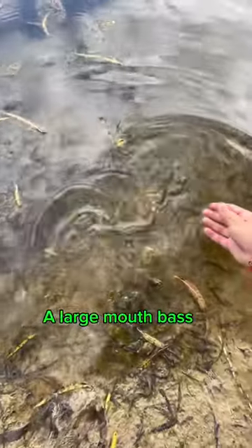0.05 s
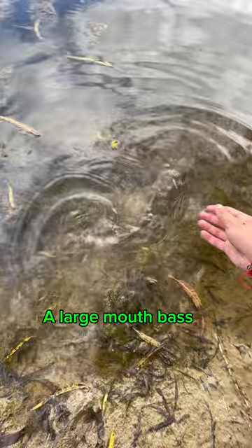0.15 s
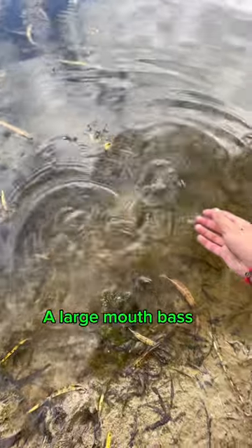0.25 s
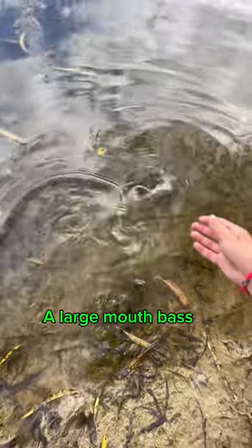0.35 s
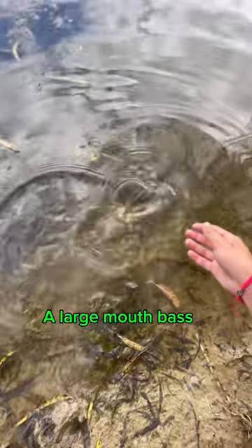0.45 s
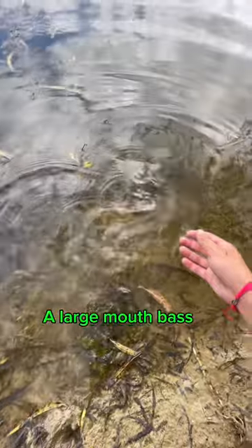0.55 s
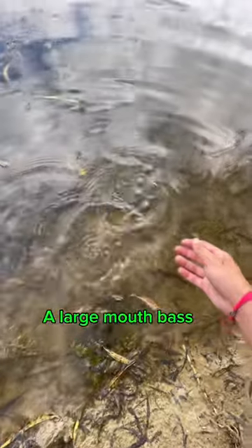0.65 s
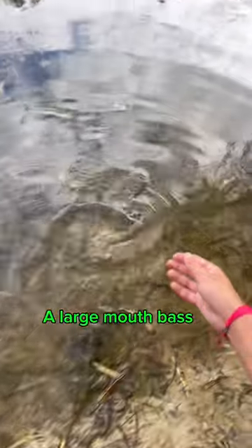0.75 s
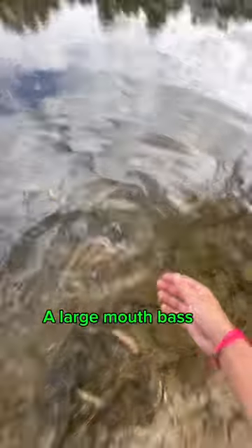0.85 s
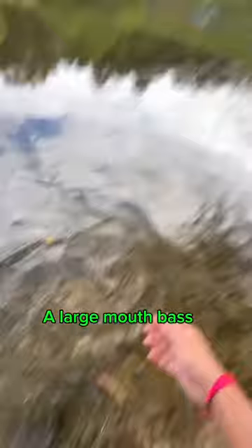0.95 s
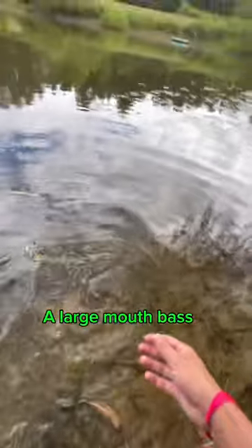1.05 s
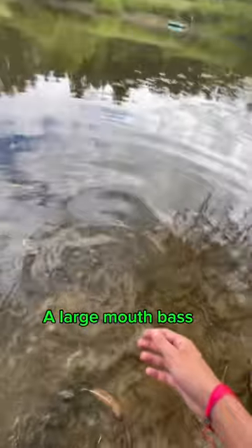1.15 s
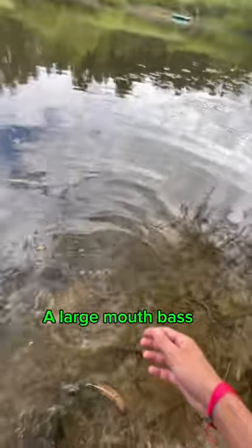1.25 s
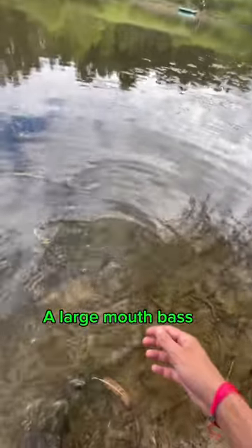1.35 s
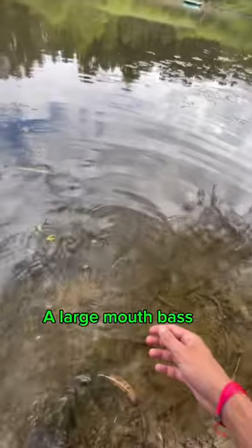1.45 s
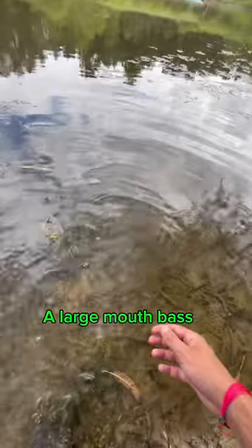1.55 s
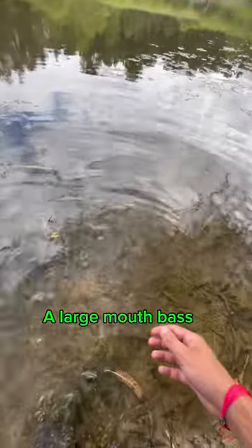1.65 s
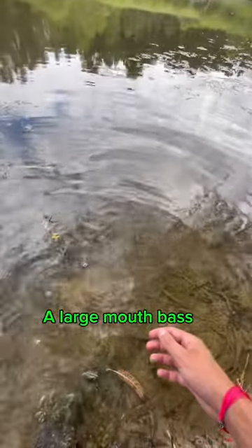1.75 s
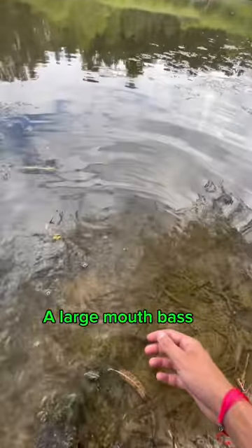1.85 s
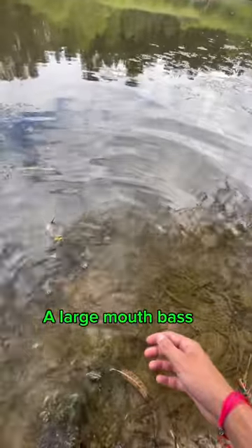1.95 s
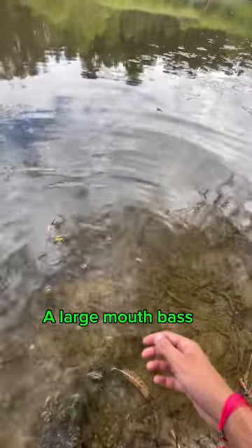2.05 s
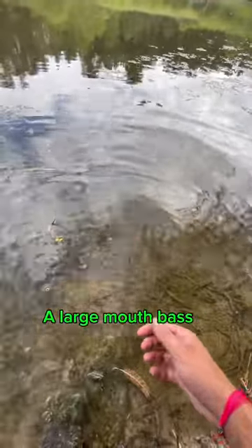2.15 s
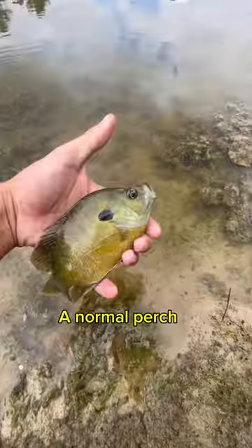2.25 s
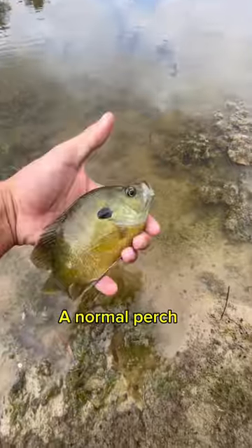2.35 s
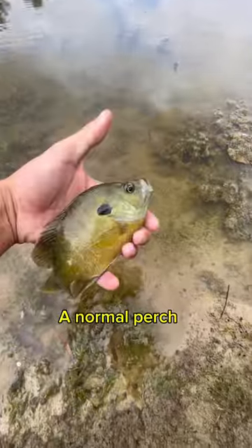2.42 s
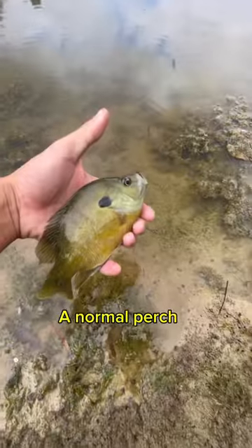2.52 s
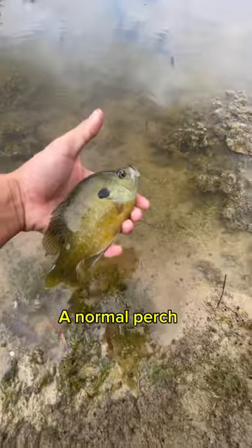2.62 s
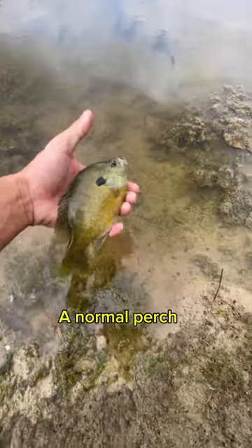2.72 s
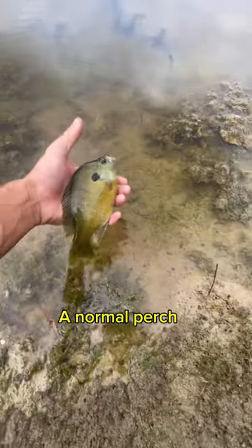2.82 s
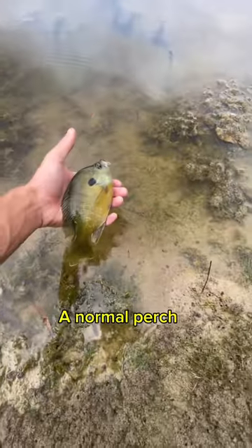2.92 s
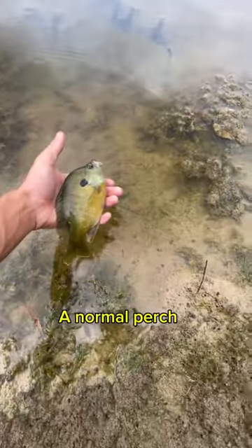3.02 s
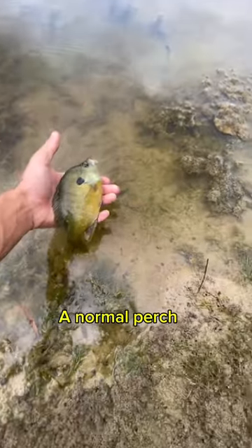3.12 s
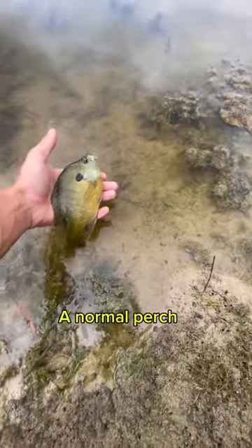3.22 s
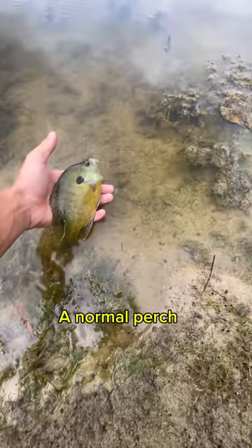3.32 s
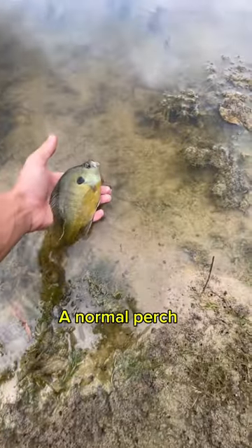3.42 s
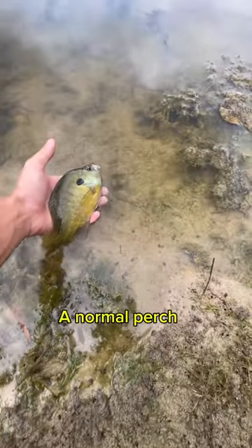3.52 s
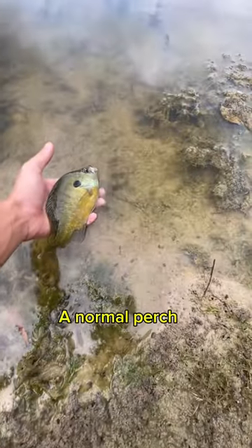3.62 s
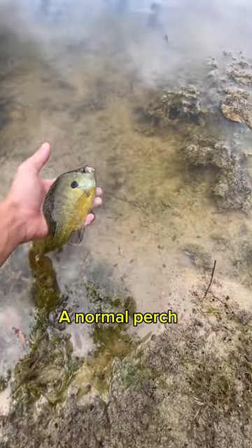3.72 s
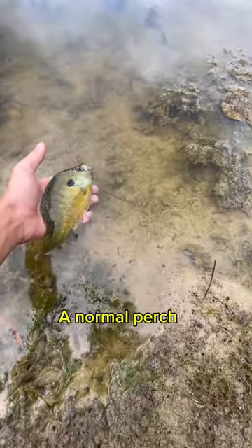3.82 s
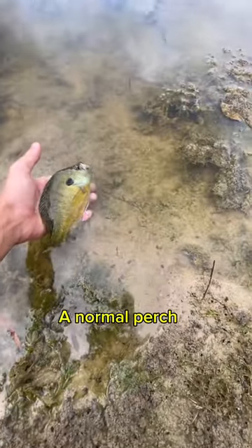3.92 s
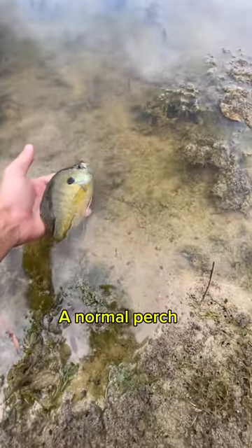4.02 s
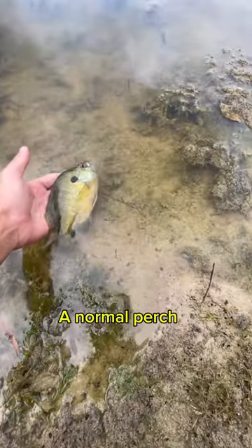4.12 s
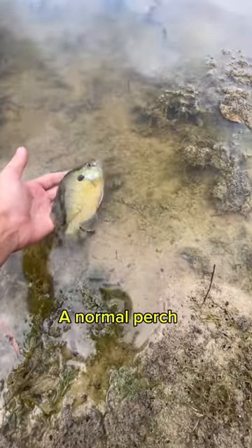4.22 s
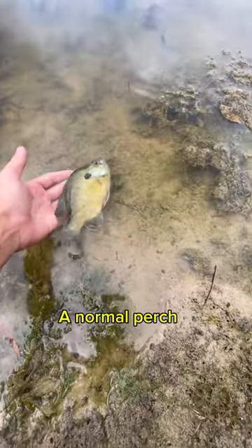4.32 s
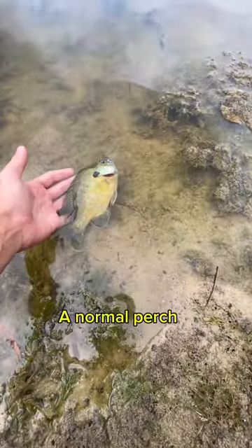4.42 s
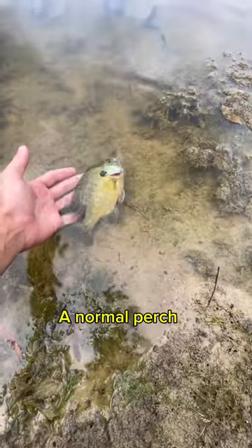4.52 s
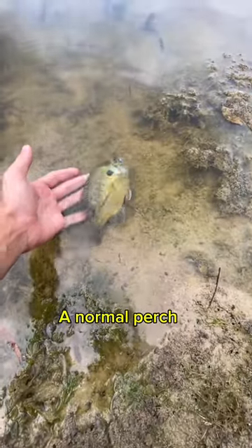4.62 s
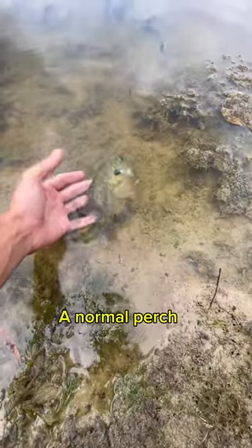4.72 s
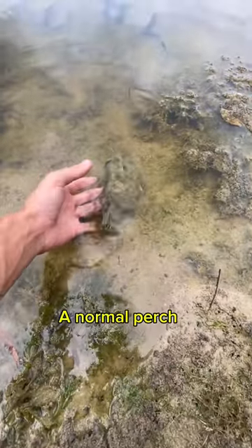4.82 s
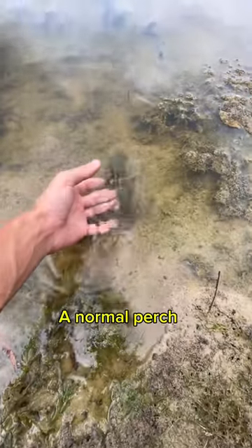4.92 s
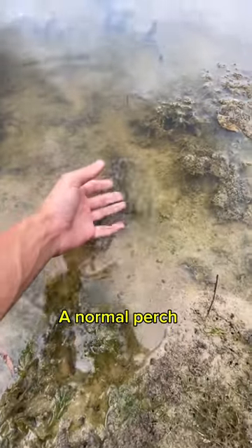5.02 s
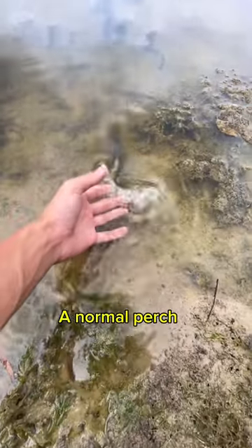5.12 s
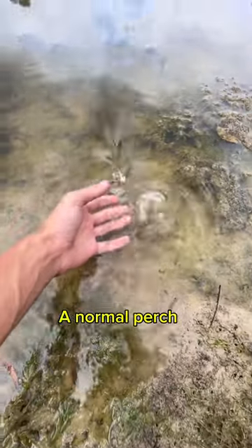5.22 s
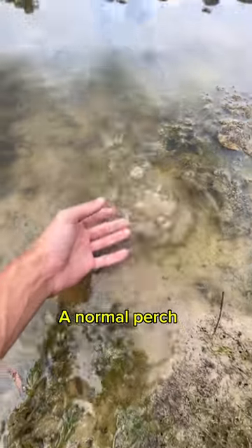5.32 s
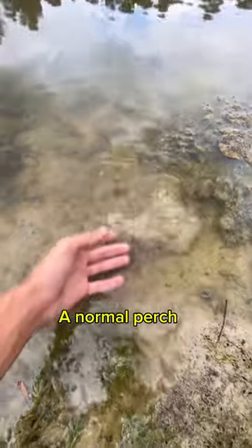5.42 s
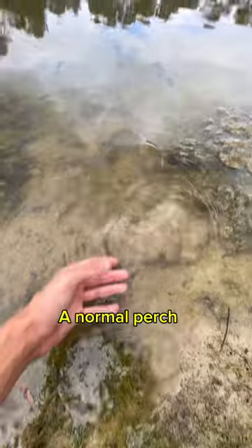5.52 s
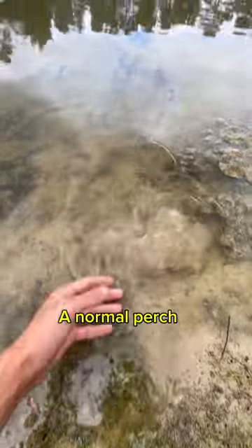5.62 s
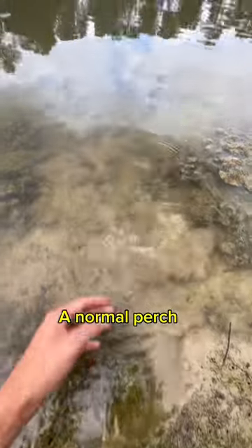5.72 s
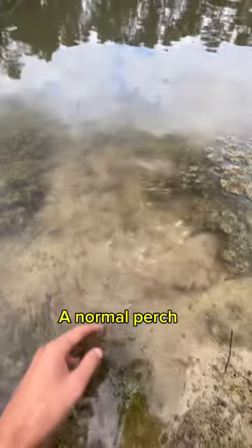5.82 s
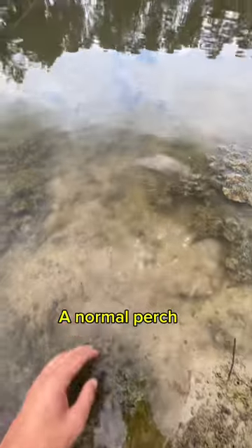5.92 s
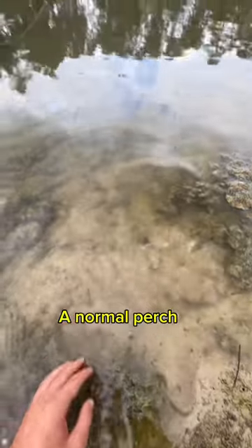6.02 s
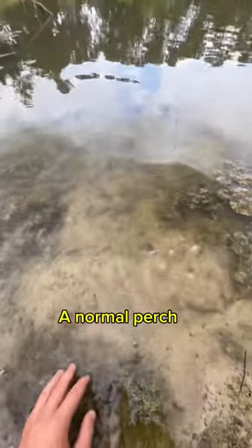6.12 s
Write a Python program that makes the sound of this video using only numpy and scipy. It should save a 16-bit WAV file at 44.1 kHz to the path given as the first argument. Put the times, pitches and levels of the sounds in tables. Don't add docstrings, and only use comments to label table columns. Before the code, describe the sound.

Outdoor pond bank, recorded close to the water by a handheld device. First come a round drip, faint far bird calls, brief piercing whistles, buzzing insects and a wavering low machine hum. The scene switches to calmer air with delicate droplet ticks and a few quick chirps. Then a released fish darts off with a dense half-second burst of gulps, slaps and spray, dying into tiny drips and fizz.

```python
import sys
import numpy as np
from scipy import signal
from scipy.fft import rfft, irfft, next_fast_len
from scipy.io import wavfile
from scipy.ndimage import uniform_filter1d

SR = 44100
rng = np.random.default_rng(int(sys.argv[2]) if len(sys.argv) > 2 else 0)


def generate_wav(signal):
    frames = np.transpose(np.atleast_2d(signal))
    scaled = np.clip(frames, -1, 1) * 32767
    pcm = np.round(scaled).astype(np.int16)
    wavfile.write(sys.argv[1], SR, pcm)


def decibels_to_gain(level_db):
    exponent = np.asarray(level_db, float) / 20
    return 10 ** exponent


N = 271995
TIME = np.arange(N) / SR
SIZE = next_fast_len(N + SR // 10)
FREQ = np.maximum(np.arange(SIZE // 2 + 1) * SR / SIZE, 1)
CUT_S = 2.143


def unit(x):
    return x / np.sqrt(np.mean(x ** 2))


def over_time(table):
    s, *columns = np.transpose(table)
    curves = [np.interp(TIME, s, column) for column in columns]
    return curves + [(TIME >= s[0]) & (TIME <= s[-1])]


def over_freq(table):
    hz, value = np.transpose(table)
    return np.interp(np.log(FREQ), np.log(hz), value)


def band(x, lo_hz, hi_hz, order=2):
    sos = signal.butter(order, [lo_hz, min(hi_hz, .45 * SR)], "band", fs=SR, output="sos")
    return signal.sosfilt(sos, x)


def walk(rate):
    k = int(SR / rate)
    held = np.repeat(rng.standard_normal(N // k + 1), k)
    return 1.6 * uniform_filter1d(uniform_filter1d(held, k), k)[:N]


def add(track, s, sound):
    i = int(s * SR)
    track[i:i + len(sound)] += sound[:N - i]


def swell(s, db, rise_s, fall_s):
    away = np.where(TIME < s, (s - TIME) / rise_s, (TIME - s) / fall_s)
    return decibels_to_gain(np.maximum(db - 17.5 * away, -160))


def grains(rate, spread_db, decay_ms):
    size = decibels_to_gain(spread_db * np.minimum(rng.exponential(size=N), 2.2))
    hits = (rng.random(N) < rate / SR) * size
    bursts = signal.lfilter([1], [1, -np.exp(-1000 / decay_ms / SR)], hits)
    return unit(rng.standard_normal(N) * (0.77 + bursts))


def whistle(table, overtone_db, rough=0):
    flutter_db, wobble = 2.2, .005
    hz, db, on = over_time(table)
    shake = rough * np.array([walk(160), walk(220)]) if rough else np.zeros(2)
    phase = 2 * np.pi * np.cumsum(hz * (1 + wobble * shake[0])) / SR
    size = uniform_filter1d(on * np.sqrt(2) * decibels_to_gain(db + flutter_db * shake[1]), size=24)
    octave = decibels_to_gain(overtone_db + db - db.max()) * np.sin(2 * phase)
    return size * (np.sin(phase) + octave)


# (t/s, f/Hz, length/ms, peak level/dB)
GULPS = [(5.0, 224, 74, -49.5), (5.05, 853, 13.7, -42.5), (5.0593, 3240, 3.9, -40), (5.068, 480, 42, -43.5),
         (5.0947, 1180, 10, -37), (5.1028, 1033, 10, -28.5), (5.1126, 1092, 21, -35),
         (5.1282, 570, 10.4, -25), (5.1335, 572, 12, -40), (5.1353, 2590, 14, -40), (5.1357, 380, 37, -34),
         (5.1502, 497, 5.5, -28.5), (5.1542, 1474, 8.4, -30), (5.162, 820, 11, -33), (5.284, 1130, 14, -57),
         (5.299, 1250, 14, -57), (5.315, 1480, 24, -61), (5.1914, 800, 6.6, -36.5), (5.1944, 903, 28, -43),
         (5.1981, 3160, 12.5, -42), (5.2042, 2670, 10, -46), (5.1795, 2250, 7, -47),
         (5.2122, 1135, 11, -38), (5.215, 470, 18, -44), (5.2153, 947, 24, -43.5),
         (5.2307, 1185, 10, -38.5), (5.2536, 872, 37, -46), (5.167, 1040, 10.4, -39),
         (5.182, 554, 7.1, -40), (5.221, 970, 10.3, -41)]
# (t/s, f/Hz, peak level/dB)
SNAPS = [(5.0283, 3040, -40.5), (5.045, 1980, -30.5), (5.046, 1270, -27.5), (5.0575, 2150, -32.5),
         (5.0642, 1630, -31.5), (5.0647, 2340, -31), (5.067, 2190, -37), (5.1074, 990, -24.5),
         (5.139, 4970, -33), (5.1464, 780, -21.5), (5.1515, 2170, -31), (5.1532, 3040, -31),
         (5.1544, 3130, -25.5), (5.156, 1610, -33), (5.1602, 10270, -30.5), (5.1706, 5760, -32),
         (5.1713, 4360, -29.5), (5.172, 5780, -29.5), (5.2133, 605, -31.5)]
# (t/s, f/Hz, length/ms, peak level/dB)
DRIPS = [(.372, 1800, 41, -62), (.66, 6200, 5, -60), (.774, 1450, 15, -55), (0.775, 2090, 12, -65),
         (2.858, 750, 18, -54), (3.76, 1450, 9.3, -62.5), (4.308, 2360, 5.1, -60.5), (4.745, 2060, 25, -72),
         (4.866, 6330, 5.2, -45.5), (5.239, 1650, 18, -56), (5.254, 2500, 18, -59), (5.272, 2300, 5.8, -55),
         (5.293, 3020, 12, -62), (5.34, 1490, 15, -53), (5.226, 3150, 6, -61), (0.353, 2190, 10, -51.5),
         (1.031, 1450, 9.3, -66), (5.405, 2360, 13, -71.5), (5.483, 2630, 10, -63), (5.512, 2470, 6, -65.5)]
# (t/s, f/Hz, length/ms, peak level/dB)
SINKERS = [
    (5.2095, 2800, 17, -38),
    (5.0798, 1375, 8.1, -30),
]


def bubbles():
    lift_s = 5.1
    rows = [(s, hz, -.35 if s < lift_s else .24, ms, db) for s, hz, ms, db in GULPS]
    rows += [(s, hz, 0.055, 2.46, db) for s, hz, db in SNAPS]
    rows += [(s, hz, 0.17, ms, db) for s, hz, ms, db in DRIPS]
    rows += [(s, hz, -0.16, ms, db) for s, hz, ms, db in SINKERS]
    shiver = .04
    out = np.zeros(N)
    for (s, hz, glide, ms, db), (turn, *kicks) in zip(rows, rng.standard_normal((len(rows), 7))):
        u = np.linspace(0, 1, int(ms * SR / 1000))
        phase = np.cumsum(hz * (1 + glide * (u - .4))) / SR + turn
        uneven = np.repeat(kicks, len(u) // len(kicks) + 1)[:len(u)]
        phase = phase + shiver * np.cumsum(uneven) * hz / SR
        size = np.abs(np.sin(np.pi * u ** 0.32)) ** 0.55
        add(out, s, decibels_to_gain(db) * size * np.sin(2 * np.pi * phase))
    return out


# (t/s, level/dB, brightness level/dB)
STROKES = [
    (5.032, -44, -16),
    (5.047, -31, -29.5),
    (5.071, -35, -13),
    (5.102, -31, -13.5),
    (5.141, -32, -16),
    (5.159, -37, -39),
    (5.176, -60, -27),
    (5.202, -41, -9.5),
    (5.228, -59.5, 4),
    (5.345, -43.5, -27),
]


def spray():
    rise_s, fall_s, churn_fall_s = 0.015, 0.025, 0.07
    deepest_s, depth_s = 5.15, 0.1
    bursts = np.array([swell(s, db, rise_s, fall_s) for s, db, _ in STROKES])
    churn = 0
    for s, db, _ in STROKES:
        churn = churn + swell(s, db - 12 * ((s - deepest_s) / depth_s) ** 2, rise_s, churn_fall_s)
    bright = decibels_to_gain(np.transpose(STROKES)[2]) @ bursts
    low = churn * decibels_to_gain(-12.0) * unit(band(grains(120, 1.7, 13.0), 416, 1310))
    middle = bursts.sum(axis=0) * decibels_to_gain(-14.5) * unit(band(grains(400, 2.9, 2.8), 1500, 4600))
    high = bright * decibels_to_gain(-3.5) * unit(band(grains(900, 4, 1.2), 3700, 12700, order=4))
    return low + middle + high


# (t/s, peak level/dB, centre f/Hz, broad crack level/dB)
TICKS = [(.3361, -34.5, 1740, -4), (.8939, -54, 3800, 9.5), (2.1436, -57, 2160, -12),
         (2.226, -57.5, 6300, 11.5), (2.315, -56, 3600, -1), (2.8484, -46, 2920, -5),
         (2.8573, -48.5, 2840, 16), (2.8624, -38.5, 4830, 17), (2.8743, -45, 2880, 5), (2.9, -57, 3000, 8),
         (2.93, -55, 2200, 6), (2.735, -57, 2450, 3), (3.474, -61, 3280, 18), (3.543, -46, 2780, -13),
         (3.637, -57, 2780, 12), (3.6725, -45, 4100, 7.5), (3.804, -54.5, 3620, -9),
         (3.8544, -55, 3840, -14), (3.8878, -46, 4370, 4), (3.989, -52.5, 4250, 7), (3.94, -65, 3700, 12),
         (4.125, -71.5, 2820, 27), (4.1434, -54.5, 4260, 9.5), (4.283, -54.5, 4270, 4),
         (4.412, -52, 4200, -9), (4.4237, -60, 3900, 10.5), (4.4443, -53.5, 4170, -3),
         (4.9206, -44.5, 5100, -9), (4.9378, -50, 4300, 3), (4.976, -52.5, 4450, 1),
         (2.866, -41.5, 2110, 13.5)]
# (t/s, peak level/dB, centre f/Hz, broad crack level/dB)
THROWN = [
    (5.026, -42.5, 2270, 12),
    (5.0938, -26, 5850, -5),
    (5.1282, -30, 2480, 8),
    (5.1355, -28, 5130, 13.5),
    (5.1696, -17.5, 6000, 4),
    (5.342, -51, 3020, 12.5),
    (5.3848, -36, 5300, -8),
    (5.4844, -56, 2830, 8),
    (5.746, -42, 6100, -22),
]
# (t/s, peak level/dB, centre f/Hz, broad crack level/dB)
PATTER = [(.2713, -56, 6040, -15), (.466, -69, 4500, 16), (.596, -62, 6030, 4), (1.678, -65, 5000, 1),
          (2.546, -52, 8400, -16), (2.688, -74, 2940, 10), (3.596, -58, 3560, -7), (3.615, -55, 3530, -8),
          (3.664, -61, 2550, 8), (3.7207, -61, 3540, -12), (3.7696, -66, 2600, -4),
          (3.782, -58, 10500, -10), (3.858, -66, 3800, -15), (3.9173, -56, 3630, -8),
          (3.9587, -58, 3880, 0), (4.006, -66, 9500, 12), (4.0574, -67, 3200, -8), (4.2081, -60, 4000, 1),
          (4.25, -53, 5960, -17), (4.456, -56, 9300, 0), (4.8276, -48, 5970, -13), (5.317, -52, 5500, -6),
          (5.3732, -53, 4940, 9), (5.414, -51, 5500, -4), (5.489, -44, 9500, -8), (5.495, -46.5, 5550, 2),
          (5.6605, -51, 10500, -19), (5.667, -48, 5500, -12), (5.7792, -50, 5400, -10),
          (5.81, -55, 5600, -13), (3.534, -54, 9500, -11)]
# (t/s, peak level/dB, centre f/Hz, broad crack level/dB)
SPITS = [(0.3007, -37, 11200, -14), (2.246, -52, 10600, 3), (4.18, -49, 12800, -5),
         (4.5508, -57.5, 11700, 5), (4.5863, -48, 10500, 1.5), (4.7717, -61.5, 9300, 18.5),
         (4.8646, -21, 10600, -44), (4.907, -53, 8300, 7.5), (4.9661, -51, 7500, -12),
         (5.0262, -34, 10400, 5), (5.323, -38.5, 10700, -2), (5.339, -30.5, 9450, -22),
         (5.384, -35, 9800, -9), (5.422, -36.5, 10100, -8), (5.547, -43.5, 9000, -14),
         (5.5767, -43, 14500, -21), (5.797, -40, 14200, -17), (5.867, -40.5, 11500, -6.5),
         (5.964, -52, 13400, -16)]


def ticks():
    lead_s = .003
    out, t = np.zeros(N), np.arange(2048) / SR - lead_s
    rows = [(*row, -15) for row in list(TICKS) + list(THROWN) + list(PATTER)]
    rows += [(*row, -3) for row in SPITS]
    spike = decibels_to_gain(-60 * np.where(t > 0, t / .008, -t / .004))
    softer = decibels_to_gain(-13 - 60 * abs(t) / .022)
    for (s, db, hz, crack_db, top_db), noise in zip(rows, rng.standard_normal((len(rows), len(t)))):
        burst = noise * (spike + softer)
        parts = band(burst, hz / 1.14, hz * 1.147), band(burst, 2160, 8100), band(burst, 7300, 15500)
        ring, crack, top = (part / abs(part).max() for part in parts)
        add(out, s - lead_s, decibels_to_gain(db - 7.0) * (ring + decibels_to_gain(crack_db) * crack + decibels_to_gain(top_db) * top))
    return out


# (peak t/s, level/dB, treble level/dB, rise t/s, fall t/s)
TRICKLE = [(0, -72, -5, .1, 0.22), (.6, -69.5, -12.5, 0.34, 1), (2.18, -75, -39, 0.046, 0.18),
           (2.77, -69.5, -21, 0.26, 0.63), (2.898, -64.5, -10, 0.05, 0.097), (3.7, -81, -35, 0.55, 0.43),
           (4.3, -85, -15, 0.62, 0.84), (5.1, -67, -16, 0.18, 0.55), (5.45, -89, 3, 0.18, 0.41),
           (5.65, -81, 9, 0.44, 0.36), (5.8, -70, -17, 0.1, 0.13), (6.17, -92.5, 14.5, 0.38, .1)]
# (t/s, length t/s, level/dB)
PUFFS = [
    (1.288, 0.02, -69),
    (1.805, 0.02, -66.5),
    (3.409, 0.023, -65.5),
    (4.344, 0.014, -65),
    (4.776, 0.031, -63),
    (5.26, 0.016, -63),
    (5.864, 0.034, -65),
]


def trickle():
    seep_db = -101.5
    flows = np.array([swell(s, db, rise, fall) for s, db, _, rise, fall in TRICKLE])
    flow = flows.sum(axis=0) + decibels_to_gain(seep_db)
    fine = decibels_to_gain(np.transpose(TRICKLE)[2]) @ flows + decibels_to_gain(seep_db - 0.5)
    fizz = grains(280, 0.41, 6.9)
    patches = 0
    for k, hz in enumerate((1100, 1600, 2320, 3360, 4880)):
        patches = patches + decibels_to_gain(1.5 * walk(14)) * band(np.roll(fizz, 211 * k), hz, 1.45 * hz)
    pops = unit(band(grains(160, 1.6, 1.8), 3770, 8640, order=4))
    puff = 0
    for s, length, db in PUFFS:
        puff = puff + decibels_to_gain(db) * np.sin(np.pi * np.clip((TIME - s) / length, 0, 1) ** 0.96)
    treble = unit(band(fizz, 5800, 12550, order=4))
    return flow * unit(patches) + fine * (decibels_to_gain(0.25 * walk(20)) * treble + decibels_to_gain(-2.5) * pops) + puff * treble


# (t/s, f/Hz, level/dB)
PLOP = [(.329, 875, -45.5), (.3358, 854, -68), (.337, 790, -30), (.342, 970, -32.5), (.35, 1100, -32),
        (.356, 1230, -36.5), (.361, 1370, -49), (.367, 1710, -53)]


def plop():
    return whistle(PLOP, overtone_db=-30)


# (t/s, length t/s, level/dB, loudest at share of length)
WHISTLES = [
    (0.482, 0.063, -50.5, 0.09),
    (0.91, 0.046, -45.5, 0.92),
    (1.23, .038, -64.5, 0.27),
]


def whistles():
    low_hz, high_hz, rise_db, fall_db = 6100, 7920, 26, 14
    u, out = np.linspace(0, 1, 24), 0
    for s, length, db, loudest in WHISTLES:
        before, after = rise_db * (1 - u / loudest) ** 2, fall_db * (u - loudest) / (1 - loudest)
        drop_db = np.where(u < loudest, before, after)
        hz = low_hz + (high_hz - low_hz) * np.sin(np.pi / 2 * u)
        curve = np.transpose([s + u * length, hz, db - drop_db])
        out = out + whistle(curve, overtone_db=-56, rough=1)
    return out


# (t/s, f/Hz, level/dB)
CHIRP = [(.003, 2714, -9.5), (.007, 3270, -0.5), (0.01, 3575, 0.5), (0.017, 3720, -1.5),
         (0.032, 3480, -3.5)]
# (t/s, level/dB, pitch factor)
CHIRPS = [
    (3.133, -60.5, 0.98),
    (3.21, -57, 0.98),
    (4.502, -66.5, 0.97),
    (4.568, -63, 1.04),
    (4.652, -62, .98),
    (5.996, -66, 0.96),
    (6.12, -68, 0.94),
]


def chirps():
    out = 0
    for s, call_db, pitch in CHIRPS:
        curve = [(s + t, hz * pitch, db + call_db) for t, hz, db in CHIRP]
        out = out + whistle(curve, overtone_db=-39)
    return out


# (loudest t/s, rise t/s, fall t/s, f/Hz, width f/Hz, level/dB)
FAR_BIRD = [
    (0.02, .05, .15, 4150, 500, -74.5),
    (0.56, .04, 0.12, 4050, 600, -70),
    (1.245, 0.042, 0.077, 3280, 200, -74),
    (1.41, 0.032, .3, 3990, 690, -69),
    (1.52, 0.1, 0.19, 4000, 600, -69.5),
    (1.5, 0.29, .3, 2750, 400, -76.5),
    (1.95, 0.18, 0.29, 4060, 389, -79.5),
]


def far_bird():
    out = 0
    for s, rise, fall, hz, width, db in FAR_BIRD:
        blur = unit(band(rng.standard_normal(N), hz - width / 2, hz + width / 2))
        out = out + swell(s, db, rise, fall) * blur
    return out


def birds():
    high, chirp = whistles(), chirps()
    echo = trees(band(high, 5000, 9000), 0.18, wet_db=-11) + trees(chirp, 0.6, wet_db=-1.5)
    aside = ports(high + far_bird(), FAR_BALANCE, 2.0)
    return aside + chirp * decibels_to_gain([[2.5], [-2.5]]) + echo


# (start t/s, end t/s, level/dB)
INSECTS = [
    (0, 1.0, -84),
    (1.0, 1.225, -75),
    (1.225, 1.43, -84),
    (1.43, 1.735, -77.5),
    (1.93, 2.143, -78),
]


def insects():
    bouts = sum(decibels_to_gain(db) * (TIME >= start) * (TIME < end) for start, end, db in INSECTS)
    bouts = uniform_filter1d(bouts, size=500)
    phase = np.cumsum(72 * (1 + 0.024 * walk(5.0))) / SR % 1
    strokes = (.35 + np.exp(-phase / .3)) * rng.standard_normal(N)
    scrape = .6 * unit(band(strokes, 8200, 9600, order=3))
    chorus = unit(band(rng.standard_normal(N), 10000, 11300, order=4)) * decibels_to_gain(2 * walk(10))
    return bouts * decibels_to_gain(9.5) * scrape + chorus * decibels_to_gain(np.where(TIME < CUT_S, -79, -86))


# (t/s, level/dB)
DRONE = [(0.0, -56), (0.14, -51.5), (0.18, -63.5), (.36, -56), (.51, -65), (.65, -60.5), (0.79, -70),
         (.87, -55.5), (0.92, -45), (.96, -54.5), (1.28, -60.5), (1.54, -61.5), (2.14, -64.5)]


def drone():
    db, on = over_time(DRONE)
    hz = 62.6 * (1 + 0.028 * walk(25.53))
    tone = np.sqrt(2) * np.sin(2 * np.pi * np.cumsum(hz) / SR)
    return on * decibels_to_gain(db + 8.0 + 1.2 * walk(6.7)) * tone


# (f/Hz, level/dB per Hz)
AIR_FIRST = [(15, -55), (25, -6.5), (80, -7), (277, -20), (363, -21.5), (476, -24.5), (962, -25.5),
             (2050, -48.5), (5280, -72), (5880, -56), (7710, -52), (10400, -55), (16000, -101)]
# (f/Hz, level/dB per Hz)
AIR_SECOND = [(15, -71), (25, -5), (102, -1), (212, -3.5), (373, -15.5), (818, -18), (1370, -37),
              (3520, -35), (3920, -44), (5880, -44), (9070, -39.5), (11000, -57), (16000, -96)]
# (t/s, rumble level/dB)
WIND = [(0, -48.5), (2.03, -64), (2.13, -61), (2.2, -72.5), (2.8, -52), (5.31, -59), (6.17, -54)]
# (f/Hz, level/dB)
APART = [(60, -3), (200, -7), (450, 0), (1000, -2), (4500, 0), (8000, -4), (10500, -16), (13000, -3)]


def air():
    noise = rfft(rng.standard_normal((3, SIZE)))
    first = unit(irfft(noise * decibels_to_gain(over_freq(AIR_FIRST)), SIZE)[:, :N]) * decibels_to_gain(-55)
    second = unit(irfft(noise * decibels_to_gain(over_freq(AIR_SECOND)), SIZE)[:, :N]) * decibels_to_gain(-54.5)
    both = rfft(np.where(TIME < CUT_S, first, second), SIZE)
    wind_db = over_time(WIND)[0]
    still_db = np.where(TIME < CUT_S, 1.5, -4)
    out = 0
    for octave in np.arange(4, 14.5, .75):
        share = np.clip(1 - abs(np.log2(FREQ) - octave) / .75, 0, 1)
        db = wind_db + 56 if octave < 6.5 else still_db
        out = out + irfft(both * share, SIZE)[:, :N] * decibels_to_gain(db + 1.1 * walk(3) + 1.3 * walk(14))
    apart = irfft(rfft(out[1:], SIZE) * decibels_to_gain(over_freq(APART)), SIZE)[:, :N]
    return far_ports(out[0]) + apart


def trees(x, t60, wet_db):
    t = np.arange(int(SR * t60)) / SR
    tail = rng.standard_normal((2, len(t))) * decibels_to_gain(-60 * t / t60) * np.clip(t / 0.003, 0, 1)
    return decibels_to_gain(wet_db) * signal.oaconvolve(x[None], tail / np.linalg.norm(tail[0]), axes=1)[:, :N]


def ports(x, balance, phase):
    half = decibels_to_gain(over_freq(balance) / 2) * np.exp(.5j * phase)
    return irfft(rfft(x, SIZE) * np.array([half, 1 / half]), SIZE)[:, :N]


# (f/Hz, phase/radians)
BODY_PHASE = [(5000, 0), (7400, 3.1), (8000, 4.0), (9500, 4.4), (10200, 6.2), (12300, 6.4), (13600, 9.0),
              (15000, 10.1), (15800, 11.3)]
# (f/Hz, phase/radians)
NEAR_PHASE = [(250, 0), (700, -.5), (1300, -1.2), (1900, -.8), (2300, -.2), (3200, .7), (4300, 2),
              (5200, 0)]
# (f/Hz, level/dB)
NEAR_BALANCE = [(250, 1), (750, 8.5), (1300, 0), (2000, -10), (3300, -10), (4500, 5.5), (5500, -4),
                (8000, -1), (12000, 0)]


def near_ports(x):
    return ports(x, NEAR_BALANCE, over_freq(NEAR_PHASE) + over_freq(BODY_PHASE))


# (f/Hz, phase/radians)
FIRST_PHASE = [(60, .15), (350, .8), (700, 3), (1000, 3.6), (3500, 3.8), (4300, 2.5), (5500, 1.4),
               (6500, 0)]
# (f/Hz, phase/radians)
SECOND_PHASE = [(450, -.2), (750, -2.7), (1300, -3.2), (2000, -4.1), (3300, -3.1), (4200, -5.2),
                (5000, -6.28)]
# (f/Hz, level/dB)
FAR_BALANCE = [(60, .5), (200, 1.5), (800, 3.5), (1600, 1.5), (2500, 1), (4000, 2), (6500, -2), (10000, 0)]


def far_ports(x):
    first, second = (over_freq(low) + over_freq(BODY_PHASE) for low in (FIRST_PHASE, SECOND_PHASE))
    return np.where(TIME < CUT_S, ports(x, FAR_BALANCE, first), ports(x, FAR_BALANCE, second))


def scene():
    water, fizz = bubbles() + ticks() + spray(), trickle()
    bank = trees(band(water, 1200, 15000), .018, wet_db=-10) + trees(fizz, .03, wet_db=-2)
    near = near_ports(water) + far_ports(fizz) + bank
    near = near + ports(plop(), [(500, -5.0), (3000, -11)], 0.22)
    return near + birds() + far_ports(insects()) + ports(drone(), FAR_BALANCE, 0.26) + air()


def low_pass(x):
    return signal.sosfilt(signal.butter(12, 16610, fs=SR, output="sos"), x)


def record(dry):
    bass_cut = FREQ ** 4 / (FREQ ** 4 + 38. ** 4)
    top_cut = (FREQ < 16400) / (1 + (FREQ / 15000) ** 8)
    mix = irfft(rfft(dry, SIZE) * bass_cut * top_cut, SIZE)[:, :N]
    return low_pass(mix)


dry = scene()
out = record(dry)
generate_wav(out)
```